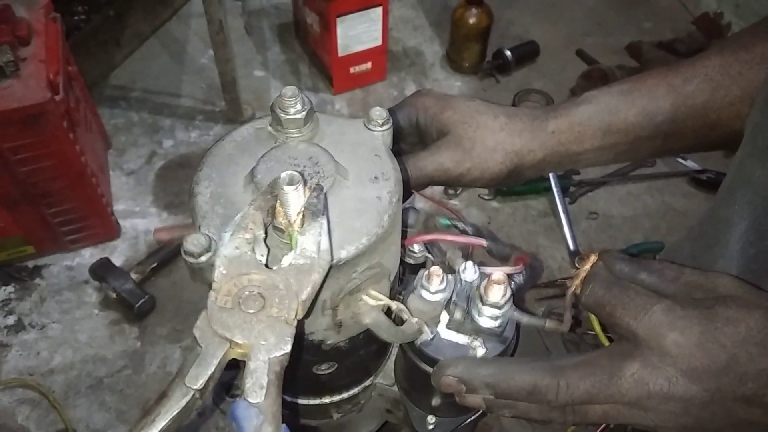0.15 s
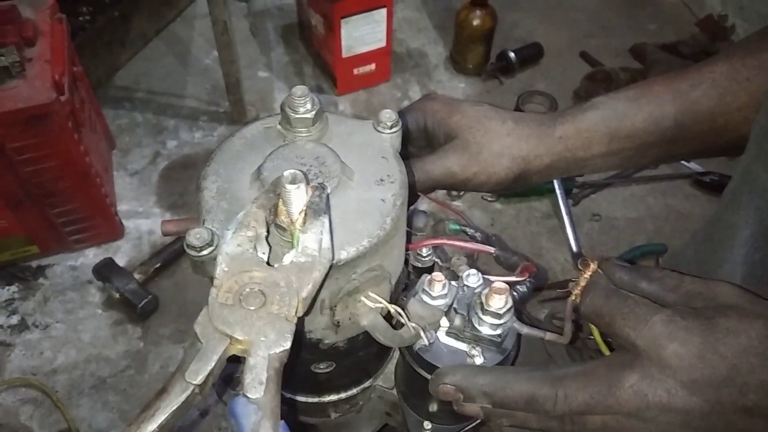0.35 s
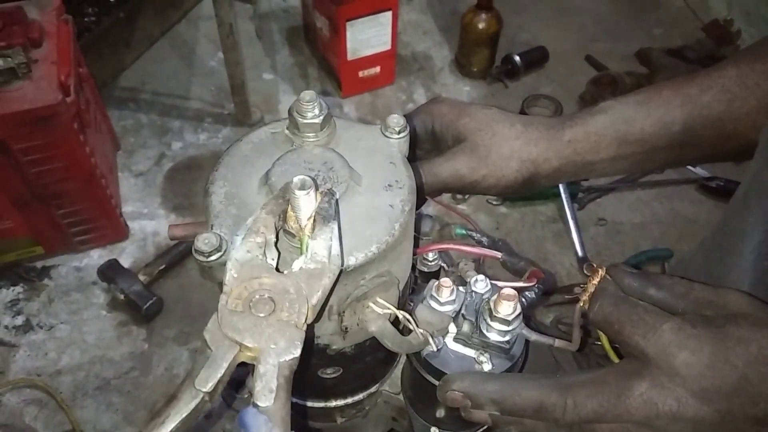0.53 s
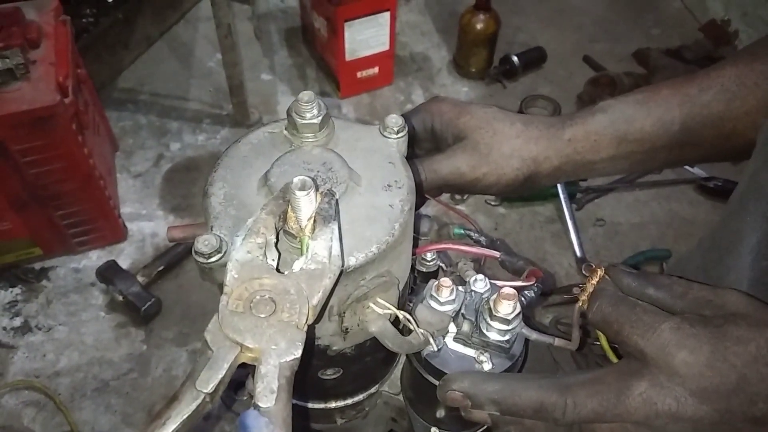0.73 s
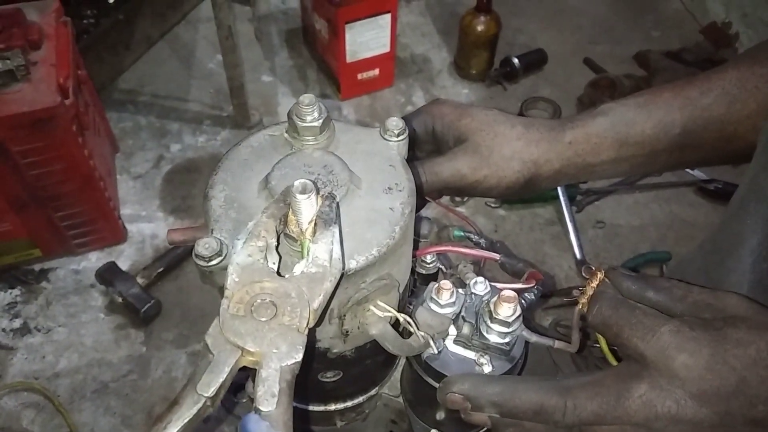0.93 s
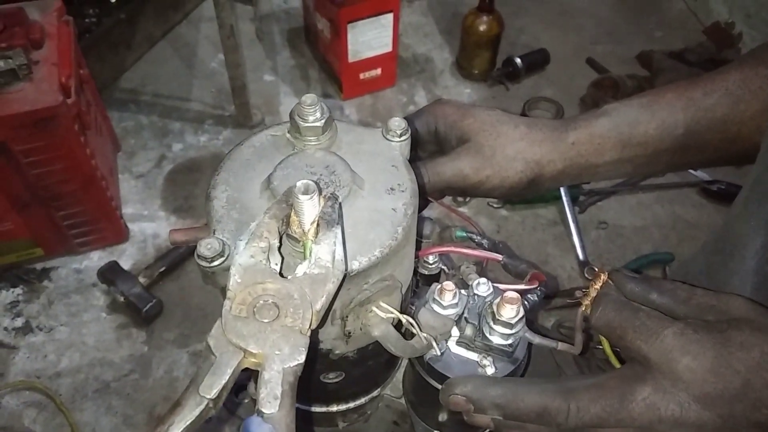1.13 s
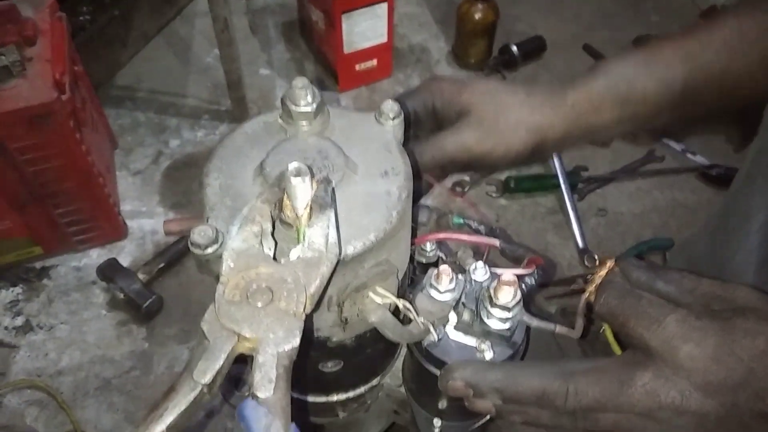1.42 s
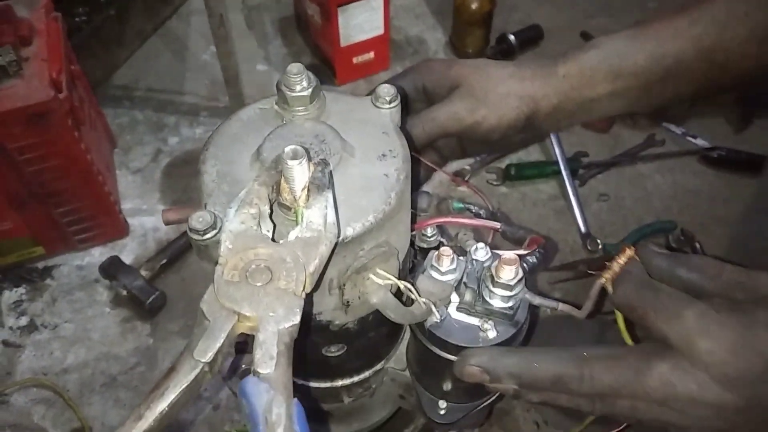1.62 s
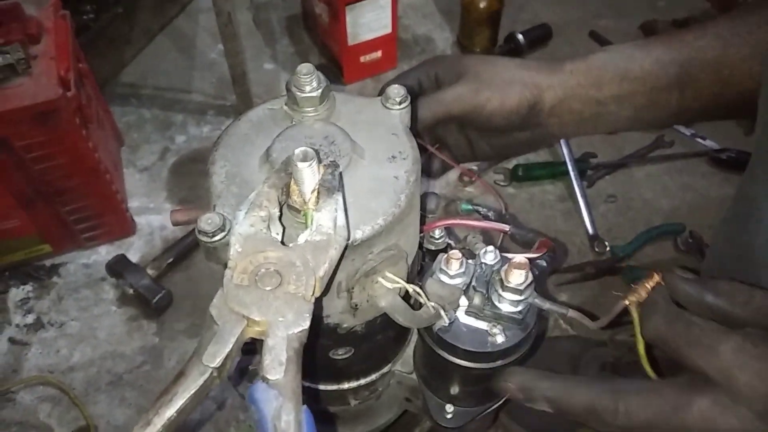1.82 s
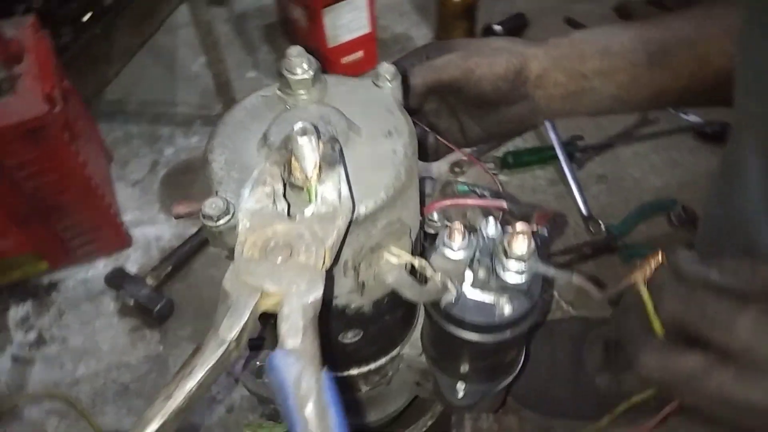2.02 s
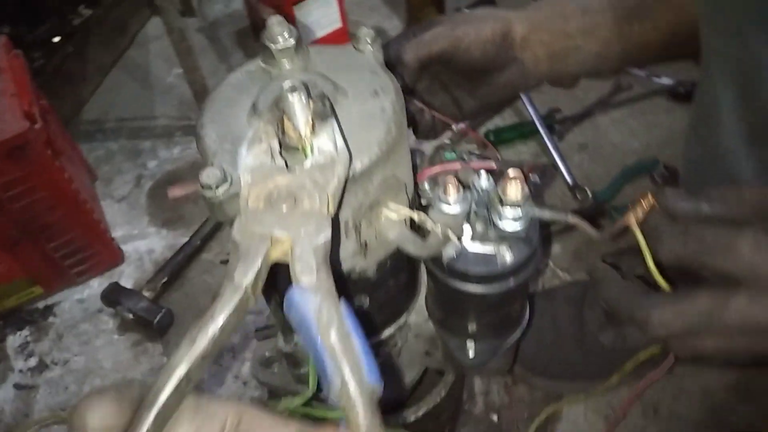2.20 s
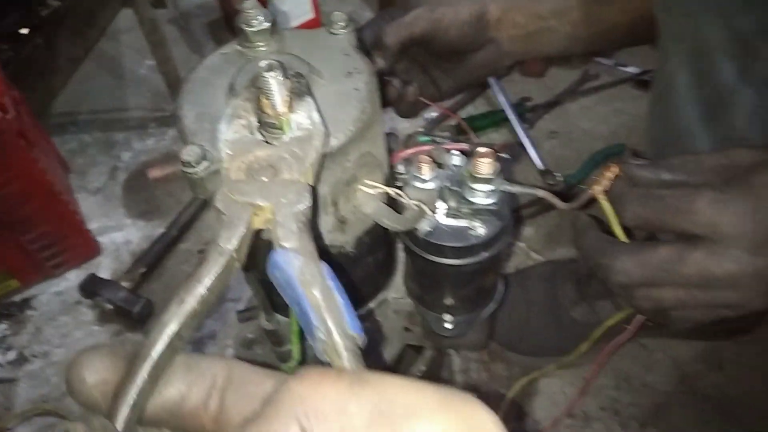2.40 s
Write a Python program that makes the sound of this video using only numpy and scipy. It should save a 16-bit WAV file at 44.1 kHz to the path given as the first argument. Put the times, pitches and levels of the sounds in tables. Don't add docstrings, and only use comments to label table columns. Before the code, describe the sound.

A starter motor on a workshop floor: a fading whine first, then a spark and loud clunk, half a second of rapid knocking and rising whir, then a long falling whine to a stop, heard close on a phone.

```python
import sys
import numpy as np
from scipy import signal
from scipy.fft import rfft, irfft
from scipy.io import wavfile
from scipy.ndimage import uniform_filter1d

SR = 44100
rng = np.random.default_rng(int(sys.argv[2]) if len(sys.argv) > 2 else 0)


def decibels_to_gain(level_db):
    exponent = np.asarray(level_db, float) / 20
    return 10 ** exponent


def digitize_waveform(pressure):
    field = np.atleast_2d(pressure).T
    bounded = np.clip(field, -1, 1)
    quanta = np.round(bounded * 32767).astype(np.int16)
    wavfile.write(sys.argv[1], SR, quanta)


N = 112454
POWER_ON_S, POWER_OFF_S, RELEASE_S = .243, .715, 0.005
TOP_HZ = 14100


def level(x, db):
    return x * decibels_to_gain(db) / np.sqrt(np.mean(x ** 2))


def band(x, hz, width):
    return signal.lfilter(*signal.iirpeak(min(hz, .45 * SR), hz / width, fs=SR), x)


def ring(x, modes):
    out = 0
    for k, (hz, db, t60) in enumerate(modes):
        width = np.log(1000) / np.pi / t60
        out = out + (-1) ** k * decibels_to_gain(db) * band(x, hz, width)
    return out


def coloured(table, noise):
    hz, db = np.array(table, float).T
    f = np.arange(N // 2 + 1) * SR / N + 1
    gain = decibels_to_gain(np.interp(np.log(f), np.log(hz), db))
    return level(irfft(rfft(noise) * gain, N), 0)


def walk(rate):
    k = int(SR / rate)
    steps = np.repeat(rng.standard_normal(N // k + 1), k)
    return 1.2 * uniform_filter1d(uniform_filter1d(steps, k), k)[:N]


def noise_pair():
    both, own = rng.standard_normal(N), rng.standard_normal((2, N))
    return both + signal.lfilter(*signal.butter(1, 900, "high", fs=SR), own)


# pitch_hz, level_db (per Hz)
SHOP_SPECTRUM = [(15, -64), (25, -14), (149, -12.5), (275, -26.5), (506, -35.5), (1190, -38.5),
                 (1510, -39.5), (1630, -37.5), (14500, -62.5)]


def shop(t):
    mid = coloured(SHOP_SPECTRUM, rng.standard_normal(N))
    side = coloured(SHOP_SPECTRUM, rng.standard_normal(N))
    side = 0.17 * side + band(side, 3000, 5000) + 0.2 * band(side, 40, 40)
    rumble = level(mid * decibels_to_gain(1.5 * walk(4.2)) + side * np.array([[1], [-1]]), -54.5)
    scuff_hz, scuff_s = 9950, 2.5
    scuff = level(band(band(rng.standard_normal(N), scuff_hz, 1200), scuff_hz, 1200), 0)
    return rumble + decibels_to_gain(-69) * np.clip((t - scuff_s) / .012, 0, 1) * scuff


def room(motor):
    t60_s, low_hz = 0.23, 540
    u = np.arange(SR // 4) / SR
    tail = rng.standard_normal((2, len(u))) * np.exp(-np.log(1000) * u / t60_s) * (u > .001)
    tail = tail / np.sqrt(np.sum(tail[0] ** 2))
    tail = signal.lfilter(*signal.butter(1, low_hz, "high", fs=SR), tail)
    return decibels_to_gain(-3) * signal.fftconvolve(motor, tail, axes=1)[:, :N]


# pitch_hz, level_db, t60_s
CASING_MODES = [(75, -6, 0.071), (128.6, -2.5, 0.086), (165, 0, 0.035), (225, -8, 0.023), (285.3, 3, 0.063),
                (527, -10, 0.044), (700, -13, .02)]


def casing(x, lowest=0):
    return ring(x, CASING_MODES[lowest:])


# start_s, level_db
THUMPS = [
    (0.223, -33.5),
    (0.26, -24),
    (0.68, -21),
    (0.685, -27.5),
    (.715, -23),
    (.727, -35.5),
    (0.798, -29.5),
    (0.81, -42),
    (.819, -34),
]


def thumps(t):
    push = sum(decibels_to_gain(db) * np.exp(-((t - s) / 0.00092) ** 2) for s, db in THUMPS)
    shudder_s, length_s, shudder_hz = 2.21, 0.09, 223.4
    shudder = np.exp(-((t - shudder_s) / length_s) ** 4) * np.sin(2 * np.pi * shudder_hz * t)
    shudder = shudder * decibels_to_gain(-51 + 0.98 * walk(30.25))
    return 2.5 * band(push, 310, 130) + 3.0 * casing(push) + shudder


# pitch_hz, level_db, t60_s
DRIVE_MODES = [(1329, -1, 0.026), (1720, -4, 0.008), (1983, 2, 0.01), (2390, -8, 0.0054),
               (2675, -9.5, 0.0064), (3622, 5, 0.0033), (4740, -4, .012), (4760, -10.5, 0.006),
               (5800, -25, .01), (7100, -23.5, .01), (950, -13, 0.0068)]


def drive_end(x):
    return ring(x, DRIVE_MODES)


def rattle(powered):
    clicks_per_s = 690
    clicks = (rng.random(N) < clicks_per_s / SR).astype(float)
    clicks = uniform_filter1d(clicks, size=9) * noise_pair()
    hiss = level(band(clicks + 0.039 * noise_pair(), 9000, 9000), -2.5)
    metal = level(drive_end(clicks), 0) + hiss
    shake = casing(noise_pair() * decibels_to_gain(1.9 * walk(60)))
    return powered * (decibels_to_gain(-31) * metal + level(shake, -31))


# start_s, level_db, bass_db, brightness_db
KNOCKS = [(0.2102, -20, -3.5, 10.5), (0.2409, -4.5, -17, 6.5), (0.2535, -1, -5, -20), (0.277, -7, -16.5, 6),
          (0.3135, -10, -6, 5.5), (0.3512, -7.5, -3, 1.5), (0.3886, -9, -4.5, 7), (0.4275, -9.5, -7, 3.5),
          (0.4656, -7, -6, 6.5), (0.5032, -7, -5, -7), (0.5422, -8, -4.5, 3.5), (0.5797, -10, -9, 0),
          (0.6192, -11, 0, 8), (0.6576, -8, 1.5, 3.5), (0.6948, -8.5, -19.5, 4.5)]


def knocks(t):
    lead_s, rise_s, fall_s, tail_s, tail_db = 0.001493, 0.0014, 0.00098, 0.0095, -19.5
    chatter, bass, bright, snap = np.zeros((4, N))
    for s, db, bass_db, bright_db in KNOCKS:
        u = t - s - lead_s
        after = np.clip(u, 0, 1)
        swell = np.exp(-(u / rise_s) ** 2)
        fall = np.exp(-after / fall_s)
        tail = decibels_to_gain(tail_db) * (np.exp(-after / tail_s) - fall)
        shape = np.where(u < 0, swell, fall + tail)
        chatter += decibels_to_gain(db) * shape
        bass += decibels_to_gain(db + bass_db) * shape
        bright += decibels_to_gain(db + bright_db) * shape
        snap += decibels_to_gain(db) * np.exp(-(u / 4e-5) ** 2)
    clunk_s, clunk_hz, clunk_fall_s = .2555, 640, 0.0028
    u = np.clip(t - clunk_s, 0, 1)
    clunk = decibels_to_gain(-10.5) * np.exp(-u / clunk_fall_s) * np.sin(2 * np.pi * clunk_hz * u)
    metal = 2.26 * drive_end(chatter * noise_pair() + 2.85 * snap)
    crack = 0.5 * bright * band(noise_pair(), 10000, 9000)
    return metal + 1.4 * casing(bass) + crack + clunk


def bearings(t, brush_db):
    stop_s, stop_len_s = 2.31, 0.0606
    friction = noise_pair() * decibels_to_gain(1.5 * walk(25))
    hum = level(band(friction, 700, 900), -4) + level(casing(friction, 2), 5)
    return decibels_to_gain(-59.5 + 0.2 * (brush_db + 37.5)) * hum * np.clip((stop_s - t) / stop_len_s, 0, 1)


# pitch_hz, width_hz, level_db
HOUSING = [(880, 440, -19.5), (1197, 240, -22), (1394, 150, -21), (2240, 350, -8), (2574, 110, -13.5),
           (4580, 500, 3.5), (5010, 500, -5), (5595, 490, 1), (6500, 310, -4), (7100, 220, -2),
           (8430, 640, 7.5), (9600, 300, -14), (11000, 280, -9.5), (12100, 500, -5.5)]


def housing(x):
    out = 0
    for k, (hz, width, db) in enumerate(HOUSING):
        out = out + (-1) ** k * decibels_to_gain(db) * band(band(x, hz, 2.7 * width), hz, 2.7 * width)
    return out


# pitch_hz, level_db (per Hz)
BRUSH_SPECTRUM = [(180, -25), (300, -14), (1790, -13), (2140, -6), (3480, -6), (4440, 0), (8630, -4.5),
                  (11400, -7.5), (14500, -22.5)]


def brush_hiss(rate):
    speed = rate / 1500
    hiss = coloured(BRUSH_SPECTRUM, noise_pair()) * decibels_to_gain(3.5 * walk(900))
    edge = signal.lfilter(*signal.butter(2, 7300, "high", fs=SR), hiss)
    hiss = hiss + edge * (speed ** .4 - 1)
    belly = signal.lfilter(*signal.butter(2, 3000, fs=SR), hiss)
    hiss = hiss + belly * (speed ** -.5 - 1)
    return decibels_to_gain(2) * hiss + level(housing(hiss), -21.5)


WHINE_HARMONICS = [-0.5, -2, -3.5, -5.5, -10, -11, -16, -18, -17.5, -18]


def whine(rate, phase, powered):
    slots = (.575, -13.5)
    tone = 0
    for k, db in [slots, *enumerate(WHINE_HARMONICS, 1)]:
        load_db = powered * (-6.5 * k + 5 * walk(150))
        gain = decibels_to_gain(db + 1.3 * walk(25.03) + load_db)
        tone = tone + gain * np.sin(k * phase) * (k * rate < TOP_HZ)
    return decibels_to_gain(6.5 + 6 * powered) * housing(tone)


# start_s, level_db
BRUSH_LEVEL = [(0, -39), (.2, -44.5), (.24, -40.5), (0.399, -28.5), (.55, -27), (.7, -32), (.78, -30),
               (.894, -32.5), (1.11, -34), (1.268, -36.5), (1.45, -39.5), (1.6, -41), (1.8, -45),
               (1.95, -46), (2.126, -56), (2.27, -65), (2.35, -92)]
# start_s, pitch_hz
BAR_RATE = [(0, 1463), (.2, 1079), (.24, 1150), (.4, 2264), (.478, 2690), (.552, 2959), (.624, 3216),
            (.7, 3345), (.74, 3337), (.894, 2970), (1.11, 2478), (1.268, 2119), (1.45, 1722), (1.598, 1427),
            (1.8, 1025), (2.126, 473), (2.33, 130)]


def armature(t, powered):
    bars_per_turn = 23
    rate = uniform_filter1d(np.interp(t, *np.array(BAR_RATE).T), size=1500)
    rate = rate * (1 + .0015 * walk(40))
    phase = 2 * np.pi * np.cumsum(rate) / SR
    turn = decibels_to_gain(-0.5 * np.cos(phase / bars_per_turn))
    brush_db = np.interp(t, *np.array(BRUSH_LEVEL).T)
    brushes = brush_hiss(rate) + whine(rate, phase, powered)
    brushes = brushes - .8 * band(brushes, 1800, 260)
    return decibels_to_gain(brush_db) * turn * brushes + bearings(t, brush_db)


def scene():
    t = np.arange(N) / SR
    released = np.exp(-np.clip(t - POWER_OFF_S, 0, 9) / RELEASE_S)
    powered = np.clip((t - POWER_ON_S) / .004, 0, 1) * released
    motor = armature(t, powered) + knocks(t) + thumps(t) + rattle(powered)
    port_lag = 7
    left = np.r_[np.zeros(port_lag), motor[0, :-port_lag]]
    left = left + band(left, 2130, 1200)
    direct = np.array([left, decibels_to_gain(-0.73) * motor[1]])
    return direct + room(motor) + shop(t)


def top_cut(x):
    return signal.sosfilt(signal.butter(12, 14740, fs=SR, output="sos"), x)


def record(dry):
    dip_hz, dip_width_hz, dip = 3600, 1150, 0.64
    edges = dip_hz + np.array([-.5, .5]) * dip_width_hz
    notched = signal.sosfilt(signal.butter(2, edges, "bandstop", fs=SR, output="sos"), dry)
    x = (1 - dip) * dry + dip * notched
    x = signal.lfilter(*signal.butter(1, 45, "high", fs=SR), x)
    x = np.tanh(0.55 * x) / 0.67
    mix = signal.sosfilt(signal.butter(12, TOP_HZ, fs=SR, output="sos"), x)
    return top_cut(mix)


dry = scene()
out = record(dry)
digitize_waveform(out)
```